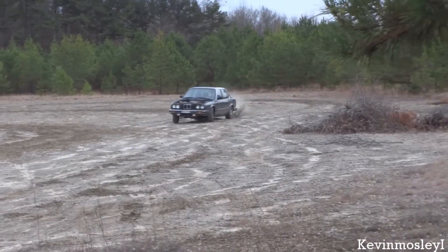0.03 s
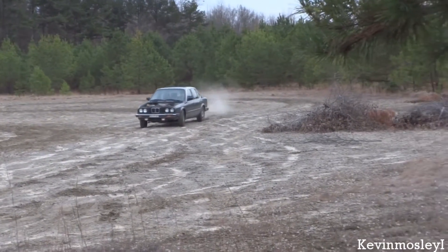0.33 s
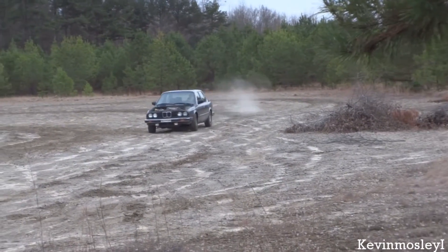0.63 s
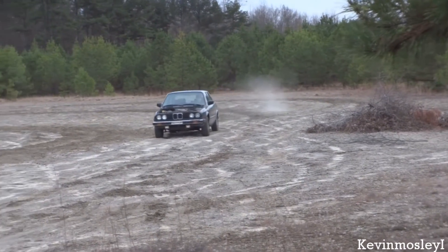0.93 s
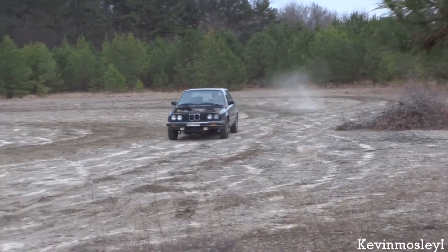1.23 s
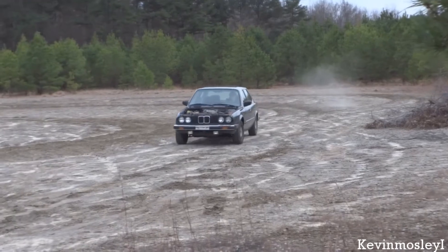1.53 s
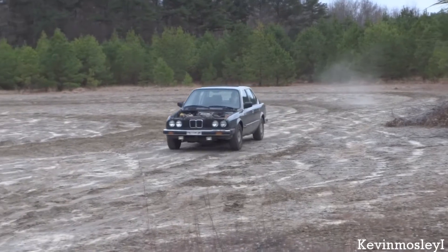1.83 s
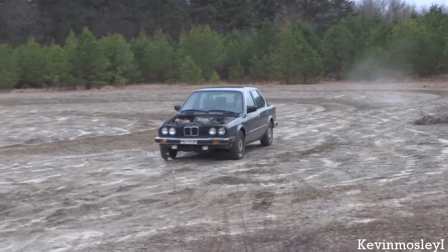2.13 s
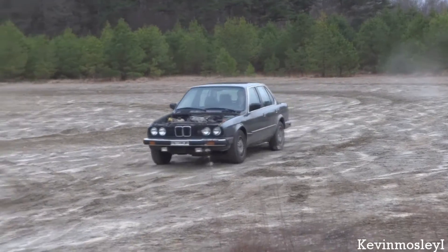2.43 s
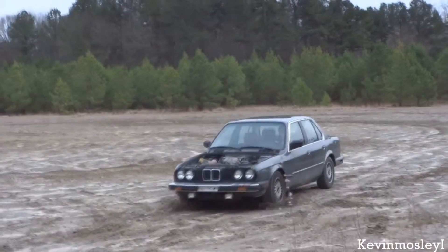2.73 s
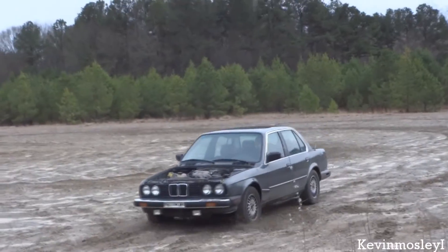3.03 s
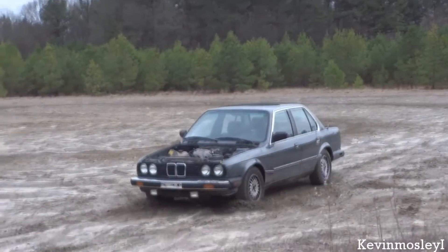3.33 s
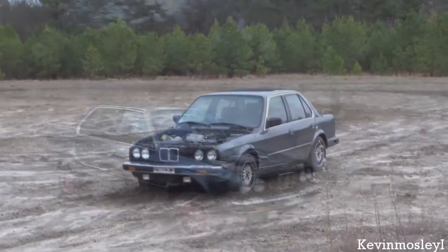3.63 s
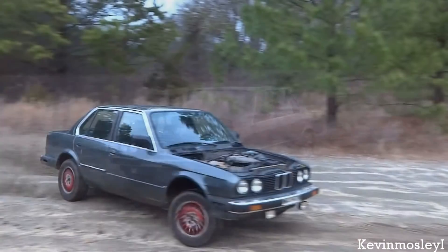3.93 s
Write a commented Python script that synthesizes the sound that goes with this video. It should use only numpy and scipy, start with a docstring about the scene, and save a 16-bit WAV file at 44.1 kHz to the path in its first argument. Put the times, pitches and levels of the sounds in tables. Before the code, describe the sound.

A car engine drones with falling revs as it approaches across an open dirt field, tires crunching gravel and flicking stones. Close to the microphone it brakes with a gritty skid, almost stalls and catches with one blip.

```python
"""A six-cylinder saloon comes out of a slide on a dirt field and drives up close.
From the start, firing pulses ring the exhaust pipe; tyres scrub, crunch gravel and flick stones.
The revs fall through the exhaust boom; at 0.4 s the pipe coughs as the throttle opens.
From 2.7 s the car brakes: tyres groan, sand sprays, the engine sinks almost to a stall.
It catches with one blip at 3.5 s, and metal chinks as the car stops."""
import sys
import numpy as np
from scipy import signal
from scipy.fft import rfft, irfft, next_fast_len
from scipy.io import wavfile
from scipy.ndimage import uniform_filter1d

SR = 44100
rng = np.random.default_rng(int(sys.argv[2]) if len(sys.argv) > 2 else 0)


def transcribe(u):
    """Save the signal u as a 16-bit wav file named by the first command-line argument.

    u: samples, shape (n,) or (channels, n), limited to [-1, 1]; the rate is SR.
    q: integer samples, one column per channel.
    """
    v = np.clip(np.atleast_2d(u).T, -1, 1)
    q = np.round(v * 32767).astype(np.int16)
    wavfile.write(sys.argv[1], SR, q)


N = 176400
CYLINDERS = 6
ENGINE_PAN_DB, TYRE_PAN_DB = 0.4, -0.8  # left over right

# exhaust pulse strength (time [s], gain [dB])
ENGINE_LOAD = [(0, -1), (.14, 1.5), (.33, -8), (.43, -4), (.475, -8), (.495, 0.5), (1.1, 1.5), (1.6, 2.5),
               (1.9, 3), (2.2, 0), (2.6, 0.9), (2.85, -5), (3.07, -1), (3.18, -12), (3.35, -7), (3.48, -2),
               (3.62, -0.5), (3.72, -4), (3.86, -15), (4, -6.5)]
# turbulent gas in the pipe (frequency [Hz], gain [dB])
GAS_SPECTRUM = [(20, -30.5), (45, -20.5), (70, -7), (150, -10.5), (235, -6.5), (300, -5.5), (410, 0.5),
                (490, -6.5), (590, -10.5), (760, -10), (950, -30.5), (1500, -31.5), (4000, -63.5)]


def undb(db):
    """Decibels to gain."""
    return 10 ** (np.asarray(db) / 20)


def unit(x):
    """Scale to rms 1."""
    return x / np.sqrt(np.mean(x ** 2))


def curve(table, column=1):
    """Table column, linear in time."""
    rows = np.array(table)
    return np.interp(np.arange(N) / SR, rows[:, 0], rows[:, column])


def walk(rate_hz):
    """Smooth random drift, rms 1."""
    step = max(int(SR / rate_hz), 2)
    return unit(uniform_filter1d(rng.standard_normal(N)[np.arange(N) // step], step))


def colour(x, spectrum):
    """Minimum-phase filter through (frequency [Hz], gain [dB]) points; output rms 1."""
    size = next_fast_len(N + N // 4)
    hz, db = np.array(spectrum).T
    bin_hz = np.arange(size // 2 + 1) * SR / size
    gain = undb(np.interp(np.log(bin_hz + 1), np.log(hz), db))
    cepstrum = irfft(np.log(gain), size)
    cepstrum[1:size // 2] *= 2
    cepstrum[size // 2 + 1:] = 0
    return unit(irfft(rfft(x, size) * np.exp(rfft(cepstrum)), size)[:N])


def band(x, centre_hz, width_hz):
    """Flat zero-phase band-pass, steep edges."""
    size = next_fast_len(N + N // 4)
    offset = np.abs(np.arange(size // 2 + 1) * SR / size - centre_hz) / (width_hz / 2)
    return irfft(rfft(x, size) / (1 + offset ** 8), size)[:N]


def stereo(mid, side, pan_db):
    """Mid/side to left/right."""
    return np.array([mid + side, mid - side]) * undb(np.array([[pan_db], [-pan_db]]) / 2)


def exhaust(firing_hz, cycle_rad):
    """Firing pulses through the pipe; at low revs the manifolds grow unequal, the beat lumpy and dull."""
    # unequal cylinders, two manifolds (order [x cycle rate], relative level [dB])
    order_levels = [(6.0, 3.24), (8.0, -26.5), (9.0, -6), (10.0, -36), (12.0, 4.5), (14.0, -14),
                    (15.0, -24.5), (16.0, -41.5), (18.0, -1), (20.0, -10), (21.0, -10.5), (22.0, -8),
                    (24.0, -6), (26.0, -8.5), (27.0, -20), (28.0, -25.5), (30.0, -7), (32.0, -21),
                    (33.0, -20.5), (36.0, -11), (42.0, -16.5), (48.0, -31.5), (54.0, -26.5)]
    # pipe and silencer response (frequency [Hz], gain [dB])
    pipe_response = [(30, -40.5), (60, -11), (90, -13), (125, -6), (155, -21), (180, -8.5), (205, -13),
                     (230, 1.5), (262, -18.5), (310, -10.5), (360, -2), (410, -1), (445, -13.5),
                     (510, -36.5), (545, -13), (572, -2.5), (610, -14), (680, -7.5), (750, -21),
                     (820, -9.5), (900, -36), (1400, -18)]
    level_db, weak_order_db, even_order_db = -16.5, -27.5, -17.5
    stumble_hz, lumpiness, dull_db_per_octave, pivot_order = 52, 0.68, 5, 19.1
    listed_db = {round(order): db for order, db in order_levels}
    stumble = 1 / (1 + (firing_hz / stumble_hz) ** 6)  # towards 1 near stall
    pulses = np.zeros(N)
    for order in range(3, 61):
        db = listed_db.get(order, weak_order_db if order % 2 or order < CYLINDERS else even_order_db)
        lag_rad = rng.uniform(0, 2 * np.pi) * (order % CYLINDERS > 0)
        is_manifold_order = order % (CYLINDERS // 2) == 0
        dull_db = dull_db_per_octave * np.log2(max(order, 2 * CYLINDERS) / pivot_order)
        slow_db = db * (1 - lumpiness * is_manifold_order) - dull_db
        gain = (1 - stumble) * undb(db) + stumble * undb(slow_db)
        pulses += gain * np.cos(order * cycle_rad + lag_rad)
    firing_index = (cycle_rad * CYLINDERS / (2 * np.pi) + .5).astype(int)
    scatter_db = .2 + 1.2 * stumble
    pulses *= uniform_filter1d(undb(scatter_db * rng.standard_normal(N)[firing_index]), size=80)
    return undb(level_db) * colour(pulses * undb(curve(ENGINE_LOAD)), pipe_response + [(4000, -68)])


def boom(pipe):
    """Exhaust boom: added to the pipe sound, sets the level of its low band."""
    # boom band (time [s], rms level [dB])
    boom_levels = [(0, -23.5), (.15, -22.5), (.23, -12.5), (.31, -10), (.37, -11.5), (.43, -24),
                   (.472, -25.5), (.5, -16), (.55, -18.5), (1.2, -20.5), (1.7, -30), (1.9, -19),
                   (2.1, -12.5), (2.35, -11.5), (2.6, -14), (2.75, -19.5), (2.85, -25.5), (3.07, -20),
                   (3.2, -48.5), (3.35, -40.5), (3.43, -17.5), (3.52, -13.5), (3.61, -13), (3.68, -23),
                   (3.8, -38.5), (3.9, -43), (4, -29.5)]
    low = band(pipe, centre_hz=235.8, width_hz=93)
    low_rms = np.sqrt(uniform_filter1d(low ** 2, size=2800))
    return low * (undb(curve(boom_levels)) / low_rms - 1)


def growl(pipe):
    """Exhaust growl: added to the pipe sound, lifts or cuts a band above the boom."""
    # growl band (time [s], gain [dB])
    growl_gains = [(0, -6.5), (.45, 0.5), (.65, 3), (1.2, 3), (1.6, 4.5), (1.95, 0.5), (2.2, 2), (3, -8),
                   (4, 9)]
    return band(pipe, centre_hz=690, width_hz=380) * (undb(curve(growl_gains)) - 1)


def engine():
    """Exhaust with boom and growl; gas noise and mechanical rasp pulse with the firings."""
    # engine speed (time [s], firing rate [Hz])
    revs = [(0.0, 176.0), (0.1, 155.62), (0.19, 134.06), (0.3, 120.48), (0.4, 111.88), (0.53, 101.91),
            (0.7, 97.22), (1.0, 95.08), (1.25, 91.36), (1.5, 86.8), (2.0, 80.68), (2.3, 76.99),
            (2.6, 73.08), (2.75, 68.5), (2.87, 61.49), (3.0, 49.39), (3.1, 38.59), (3.2, 30.74),
            (3.3, 27.11), (3.42, 41.39), (3.49, 45.93), (3.58, 46.67), (3.66, 44.04), (3.74, 32.08),
            (3.88, 29.58), (4.0, 36.56)]
    # rasp of the open engine bay (frequency [Hz], gain [dB])
    rasp_spectrum = [(500, -22), (850, -9.5), (904, -11), (988, 9), (1110, -4.5), (1320, 6), (1560, -13.5),
                     (2090, -14.5), (2370, -5.5), (3000, -9), (3340, -14), (4310, -24.5), (4960, -31.5),
                     (6130, -33), (7000, -33.5), (9100, -59.5), (15400, -120)]
    gas_db, rasp_db, gas_pulsing, rasp_pulsing = -30.5, -40, 0.32, 0.28
    bass_hz, bass_left, width = 110, .17, .18
    firing_hz = curve(revs) * (1 + .001 * walk(24.22))
    cycle_rad = 2 * np.pi * np.cumsum(firing_hz) / SR / CYLINDERS
    beat = np.cos(CYLINDERS * cycle_rad)
    speed = firing_hz / firing_hz.mean()
    load = undb(curve(ENGINE_LOAD))
    gas = colour(rng.standard_normal(N) * (1 + gas_pulsing * beat), GAS_SPECTRUM)
    gas *= undb(gas_db) * load * speed ** .5
    rasp = colour(rng.standard_normal(N) * (1 + rasp_pulsing * beat), rasp_spectrum)
    rasp *= undb(rasp_db) * load * speed
    pipe = exhaust(firing_hz, cycle_rad) + gas
    mid = pipe + rasp + boom(pipe) + growl(pipe)
    bass = signal.sosfiltfilt(signal.butter(1, bass_hz, fs=SR, output="sos"), mid)
    side = width * np.imag(signal.hilbert(mid)) + bass_left * bass
    return stereo(mid, side, ENGINE_PAN_DB)


def grains(rate_hz, spread_db):
    """Random clicks of uneven size, rms 1."""
    hits = rng.random(N) < rate_hz / SR
    signs = rng.choice([-1, 1], N)
    return unit(hits * signs * undb(spread_db * np.minimum(rng.exponential(size=N), 6)))


def gravel(spectrum, level_db, rate_hz, spread_db, patch_db, width):
    """Grains under the tread, in uneven patches."""
    patches = undb(patch_db * (walk(21.78) + walk(90)) / 2)
    mid, side = (colour(patches * (grains(rate_hz, spread_db) + .5 * rng.standard_normal(N)), spectrum)
                 for _ in range(2))
    return stereo(mid, width * side, TYRE_PAN_DB) * undb(level_db)


def tyres():
    """Under the tyres dirt scrubs, pebbles crunch, grit crackles."""
    # ground contact, relative levels (time [s], scrub [dB], crunch [dB], grit [dB])
    contact = [(0, -26, -39.5, -50), (.2, -29.5, -46, -58), (.35, -31, -47.5, -60), (.6, -35.5, -49, -64),
               (.95, -32, -40, -60), (1.3, -35, -43.5, -56), (1.65, -29.5, -39.5, -54.5),
               (1.8, -32.5, -38.5, -49.5), (2.15, -35, -41.5, -52.5), (2.35, -35.5, -44, -54),
               (2.48, -32, -39, -51), (2.58, -35, -46, -55), (2.69, -25, -35.5, -47),
               (2.83, -25.5, -35, -43), (3.05, -26, -37.5, -50), (3.3, -27, -43, -53),
               (3.4, -27.5, -38.5, -51), (3.5, -29, -39.5, -52), (3.62, -32.5, -41, -51),
               (3.72, -36, -53, -54.5), (3.8, -41.5, -53, -56), (3.86, -33, -54, -55),
               (4, -42.5, -51.5, -60)]
    # dirt, pebble and grit spectra (frequency [Hz], gain [dB])
    dirt = [(40, -31), (100, -6.5), (250, 8), (400, -1.5), (500, -5), (720, 2.5), (950, -4.5), (1200, -0.5),
            (1450, -8), (1650, -18.5), (2400, -20.5), (6000, -53)]
    pebbles = [(500, -19), (1300, 0), (1850, 6.5), (2200, -4), (2850, 8), (3500, 1), (5000, -4),
               (6300, -12), (9000, -37), (16000, -43)]
    grit = [(1500, -24.5), (4000, -2.5), (5000, 0.5), (5800, -3), (6200, -9), (6600, -2.5), (7500, -6.5),
            (9000, -10.5), (11000, -14.5), (15500, -19)]
    scrub_db, crunch_db, grit_db = curve(contact, 1) + 3.5, curve(contact, 2) - .5, curve(contact, 3) + 2.5
    scrub = gravel(dirt, scrub_db, rate_hz=450, spread_db=-0.5, patch_db=2, width=.11)
    crunch = gravel(pebbles, crunch_db, rate_hz=1500, spread_db=1.5, patch_db=2.5, width=.22)
    crackle = gravel(grit, grit_db, rate_hz=3200, spread_db=2, patch_db=1, width=.049)
    return scrub + crunch + crackle


def stones():
    """Each flicked stone cracks and rings briefly at its own pitch."""
    # stone hits (time [s], peak [dB], pitch [Hz])
    flicks = [(.235, -39, 4850), (.85, -32, 3600), (0.926, -32, 2220), (1.352, -26.5, 2010),
              (1.609, -28, 1650), (1.78, -26, 2920), (1.842, -30.5, 5500), (1.899, -25, 1770),
              (1.9, -28, 5400), (2.078, -34.5, 7500), (2.187, -29.5, 4703), (2.265, -30.5, 2000),
              (2.473, -37, 5400), (2.548, -27.5, 1930), (2.681, -21.5, 1380), (2.702, -27, 2870),
              (2.747, -20, 1250), (2.836, -18, 1850), (2.892, -26, 1700), (3.015, -27, 6440),
              (3.207, -23.5, 1720), (3.25, -30, 4640), (3.432, -27.5, 3500), (3.472, -27, 2860),
              (3.515, -23, 2430), (3.555, -21, 2460), (3.558, -20, 3980), (3.848, -47, 5950),
              (3.912, -40, 4940)]
    ring_q, decay_s, crack_db, crack_band_hz, lowpass_hz = 5.7, 0.0065, -12.5, [1500, 7000], 7200
    age_s = np.arange(SR // 16) / SR
    out = np.zeros(N)
    for start_s, peak_db, pitch_hz in flicks:
        noise = rng.standard_normal(len(age_s))
        ring = unit(signal.lfilter(*signal.iirpeak(pitch_hz, ring_q, fs=SR), noise))
        crack = unit(signal.lfilter(*signal.butter(1, crack_band_hz, "band", fs=SR), noise))
        hit = (ring + undb(crack_db) * crack) * np.exp(-age_s / decay_s)
        hit = signal.lfilter(*signal.butter(2, lowpass_hz, fs=SR), hit)
        first = int(start_s * SR)
        out[first:first + len(hit)] += undb(peak_db) * hit / np.abs(hit).max()
    return out


def cough():
    """One puff of gas knocks the pipe as the throttle opens."""
    start_s, peak_db, decay_s = 0.39, -8.5, 0.0069
    age_s = np.arange(N) / SR - start_s
    envelope = (age_s > 0) * np.exp(-np.abs(age_s) / decay_s)
    puff = colour(rng.standard_normal(N) * envelope, GAS_SPECTRUM)
    return stereo(undb(peak_db) * puff / np.abs(puff).max(), 0, ENGINE_PAN_DB)


def groans():
    """Sliding rubber sticks and slips in short wavering tones."""
    # tyre slips (start [s], length [s], start pitch [Hz], end pitch [Hz], level [dB])
    slips = [(2.661, 0.16, 1370, 1216, -34), (2.9, 0.12, 790, 803, -26), (2.976, 0.21, 1210, 1120, -28),
             (3.192, .17, 790, 632, -32), (3.29, 0.072, 1074, 1190, -27), (3.405, 0.24, 735, 850, -30)]
    time_s = np.arange(N) / SR
    out = np.zeros(N)
    for start_s, length_s, from_hz, to_hz, level_db in slips:
        progress = np.clip((time_s - start_s) / length_s, 0, 1)
        pitch_hz = (from_hz + (to_hz - from_hz) * progress) * (1 + .035 * walk(150))
        envelope = undb(level_db) * np.sin(np.pi * progress) * (1 + .5 * walk(90))
        out += envelope * np.sin(2 * np.pi * np.cumsum(pitch_hz) / SR)
    return out


def sand():
    """Braked wheels throw a hissing spray of sand."""
    # spray strength (time [s], level [dB])
    spray_levels = [(0, -88), (2.66, -78.5), (2.68, -49), (2.84, -46), (3.15, -43.5), (3.28, -50),
                    (3.55, -50), (3.75, -69), (4, -74)]
    # spray spectrum (frequency [Hz], gain [dB])
    spray_spectrum = [(2500, -30), (5000, 0.5), (7000, -3), (9000, -1), (11000, -5), (15500, -7)]
    return gravel(spray_spectrum, curve(spray_levels), rate_hz=2500, spread_db=3, patch_db=3, width=.06)


def chink():
    """Metal rings once as the car stops."""
    start_s, pitch_hz, level_db, decay_s = 3.848, 6950, -40, .013
    age_s = np.maximum(np.arange(N) / SR - start_s, 0)
    envelope = undb(level_db) * np.exp(-age_s / decay_s) * (1 + 0.78 * walk(400))
    return envelope * np.sin(2 * np.pi * pitch_hz * age_s)


def scene():
    """Engine, tyres and stones in open air."""
    return engine() + tyres() + stones() + cough() + groans() + sand() + chink()


def record(dry):
    """Steep low-pass on the top of the treble."""
    cutoff_hz = 15700
    return signal.sosfilt(signal.ellip(10, .2, 80, cutoff_hz, fs=SR, output="sos"), dry)


dry = scene()
out = record(dry)
transcribe(out)
```